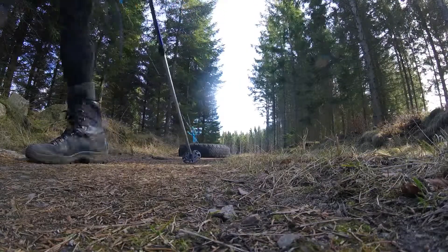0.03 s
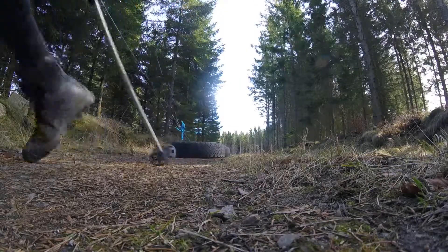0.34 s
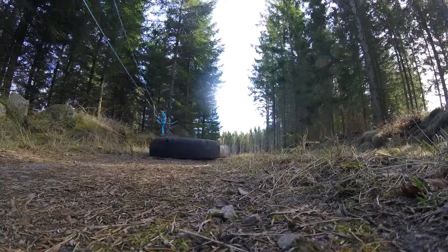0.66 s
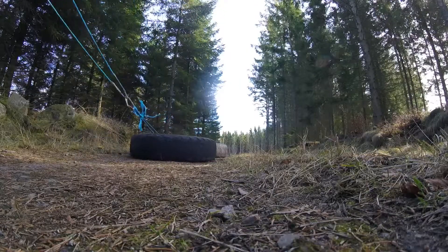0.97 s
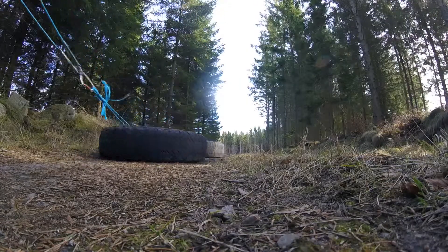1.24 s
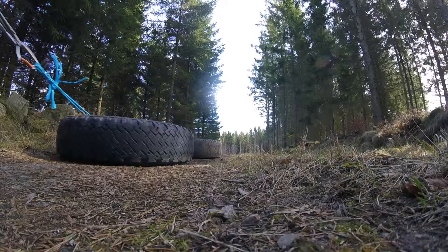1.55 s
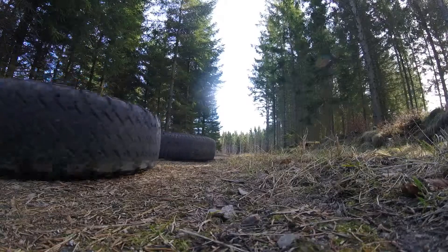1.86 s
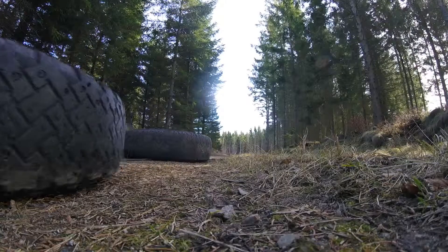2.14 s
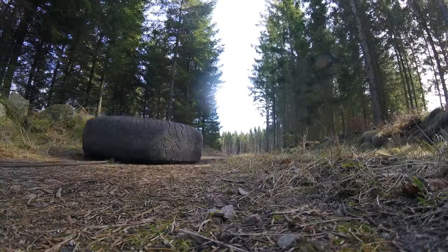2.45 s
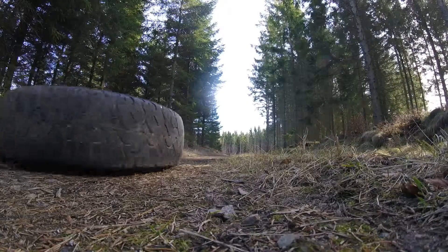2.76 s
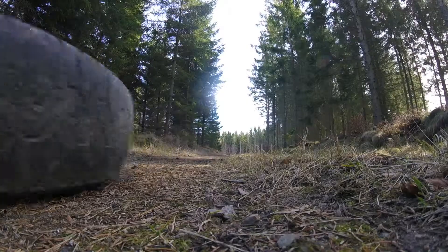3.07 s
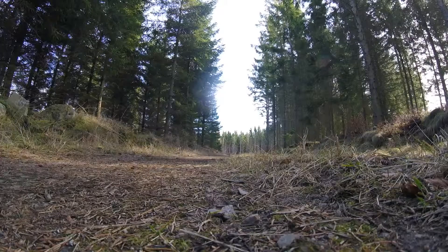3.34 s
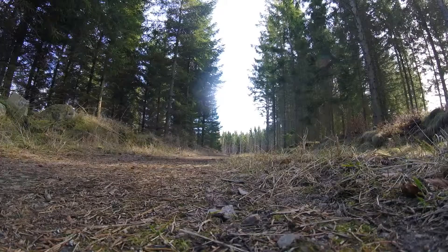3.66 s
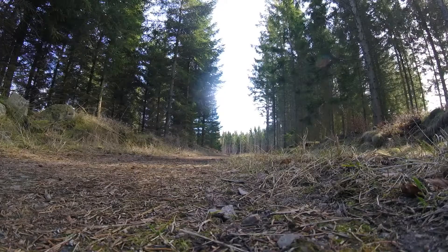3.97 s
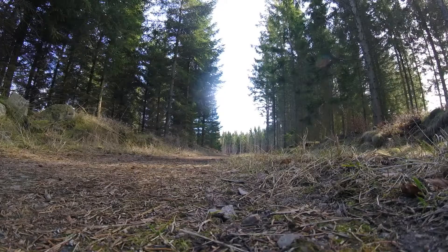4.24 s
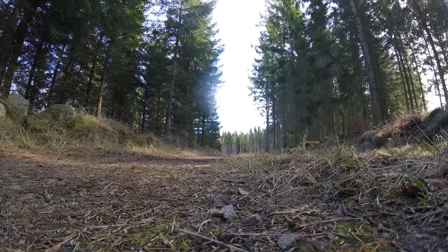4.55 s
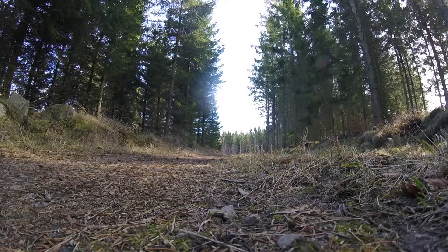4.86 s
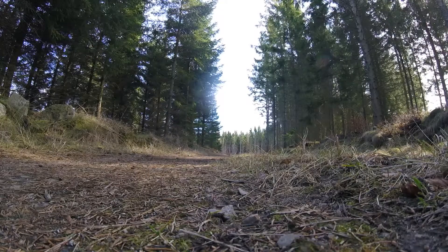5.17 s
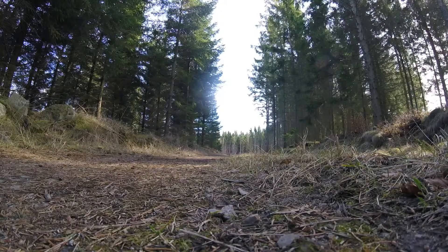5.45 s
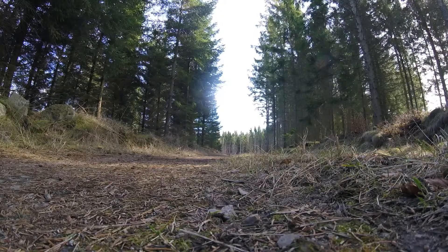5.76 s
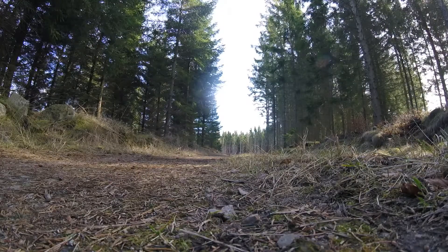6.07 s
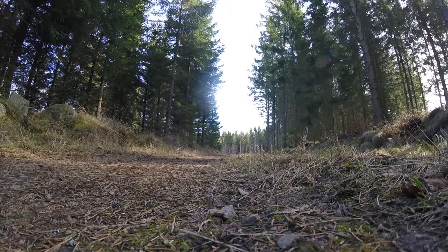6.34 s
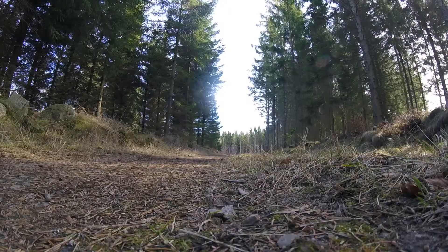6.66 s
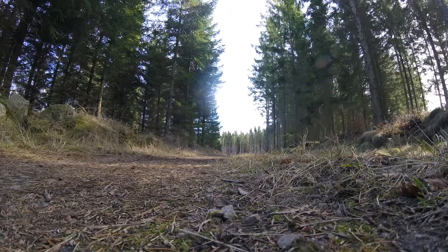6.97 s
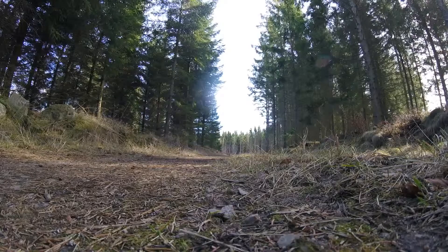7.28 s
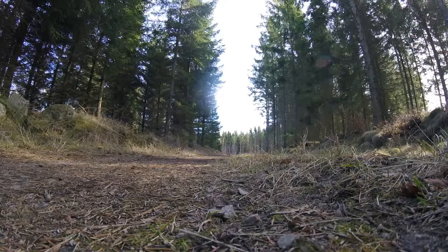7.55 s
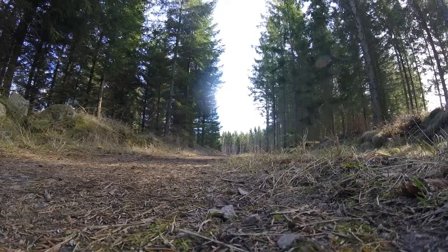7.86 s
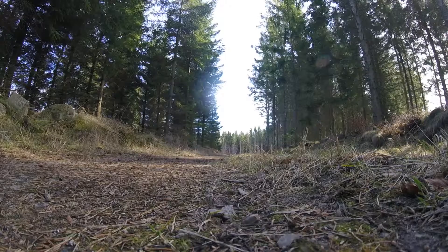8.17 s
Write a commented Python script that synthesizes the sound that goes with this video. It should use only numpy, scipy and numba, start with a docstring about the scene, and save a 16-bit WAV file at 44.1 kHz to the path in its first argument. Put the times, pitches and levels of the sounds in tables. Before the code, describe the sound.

Rough, crunching scraping approaches as two tyres are dragged over gravel, with a couple of sharp clicks from a trekking pole early on. The tyres pass one after the other close to a low microphone, with clacking stones, twig snaps, hollow rubber booms and ground rumble. The dragging moves away and comes to rest, and only a soft forest hush with a low hum remains.

```python
"""Two car tyres are hauled on a rope, stride by stride, along a forest gravel path, past a listener
at ground level, and come to rest. Stones knock against the rubber, grit crunches and twigs snap
under it, and the air inside the tyres booms. A trekking pole clicks on a stone.
A faint steady hiss and a low hum remain when the dragging stops."""
import sys
import numpy as np
from scipy import signal
from scipy.fft import rfft, irfft
from scipy.io import wavfile
from scipy.ndimage import uniform_filter1d
from numba import njit

SR = 44100
rng = np.random.default_rng(int(sys.argv[2]) if len(sys.argv) > 2 else 0)


def int16_out(signal):
    """Quantize to a 16-bit WAV file."""
    q = np.round(np.clip(np.atleast_2d(signal).T, -1, 1) * 32767)
    wavfile.write(sys.argv[1], SR, q.astype(np.int16))


N = 362061

# The tone of crunching grit and of hissing sand. Each row: frequency in Hz, relative level in dB.
GRIT_SPECTRUM = [(200, -1.5), (650, -1.5), (1300, 2), (2000, 4), (2900, 2.5), (3500, -2), (4200, -6),
                 (5600, -2), (7000, -14.5), (10000, -27), (14000, -98)]
SAND_SPECTRUM = [(2000, -28), (3900, -7), (4900, 3), (5900, 3.5), (6500, -1), (7000, -8), (8000, -11.5),
                 (9500, -20.5), (11000, -31.5), (14000, -58.5)]


def dragging():
    """The tread catches and slips over stones, grit and sand; all of them flutter with its grip."""
    pull_db, extra_grit_db = hauling()
    near_db = nearness()  # each layer follows its own share of this rise and fall
    ground_db = pull_db + drift(6.1)
    grit_db = ground_db + extra_grit_db
    boom_jolt, ground_jolt = jolts()
    grip = drift(24.6)
    coarse = grains(650, spread_db=3.0) * from_db(2.0 * grip)
    fine = grains(4000, spread_db=2.5) * from_db(3.7 * grip)
    dust = grains(9000, spread_db=4.0) * from_db(2.0 * grip)
    contacts = rms_one(fine) + 0.92 * rms_one(coarse)
    rolling = from_db(-35 + ground_db + 0.26 * near_db) * rolling_stones(coarse, fine)
    # Small chips ring as they are ground together.
    ticks = pings(rms_one(coarse) + 0.5 * rms_one(fine), low_hz=1680, high_hz=7400, cycles=20.0)
    grit = from_db(-39 + grit_db + 0.33 * near_db) * grinding_grit(contacts, ticks)
    sand = from_db(-39.5 + grit_db + 0.49 * near_db + sand_shade()) * hissing_sand(dust, ticks)
    boom_gain = from_db(-35 + 0.96 * pull_db + 0.037 * near_db + drift(6.5))
    boom = np.hypot(boom_gain, boom_jolt) * flexing(air_boom(contacts), bend=0.018, rate=7.97)
    boom = resonate(boom, hz=255, width=244)  # the hollow tyre rounds off each jolt
    walls = from_db(-46.5 + grit_db + 0.27 * near_db) * rubber_walls(coarse)
    rumble_gain = from_db(-40.5 + ground_db + 0.72 * near_db)
    rumble = np.hypot(rumble_gain, ground_jolt) * ground_rumble(fine)
    return rolling + grit + sand + boom + walls + rumble


def hauling():
    """Each stride tightens the rope. Gives the level of the drag and of its extra grit, in dB."""
    # Each row: time of full pull in seconds, length in seconds, boost in dB, extra grit in dB.
    pulls = [(0.167, 0.27, 2, 0), (1.056, 0.3, 2.5, 2.5), (1.735, 0.44, 3.5, 1.5), (2.267, 0.48, 5, -2),
             (3.031, 0.54, 6, -1.5), (3.69, 0.36, 4, 0), (4.29, 0.25, 3, 1.5), (4.714, 0.1, 2, -1.5),
             (5.244, 0.25, 1, 2.5), (5.673, 0.024, 10, 9.5)]
    # The tyres hang back for a moment. Each row: start in seconds, length in seconds, dip in dB.
    lulls = [(0.553, 0.028, -4.5), (0.676, 0.024, -5.5), (0.778, 0.013, -7), (1.99, 0.075, -3.5),
             (2.122, .01, -3.5), (2.169, 0.037, -3.5), (2.301, 0.01, -7.5), (2.389, 0.019, -5),
             (3.519, 0.017, -5), (4.095, 0.055, -3), (5.145, 0.03, -1.5)]
    # The walker tires and stops. Each row: time in seconds, change of level in dB.
    slowing = [(4.5, 2.5), (5.49, -4.5), (5.6, -17.5), (5.7, -25.5), (5.88, -50)]
    surges = np.array([swell(s, length, rise_s=0.067, fall_s=0.062) for s, length, *_ in pulls])
    dips_db = sum(db * swell(s, length, rise_s=0.014, fall_s=0.014) for s, length, db in lulls)
    _, _, pull_db, grit_db = np.transpose(pulls)
    return pull_db @ surges + dips_db + in_time(slowing), grit_db @ surges


def nearness():
    """Level in dB of the two tyres going by: power falls with the square of the distance."""
    # Each row: time when a tyre is closest in seconds, seconds it takes to travel that distance.
    passes = [(1.98, 0.2), (3.2, 0.14)]
    t = np.arange(N) / SR
    return 10 * np.log10(sum(1 / (1 + ((t - s) / passing_s) ** 2) for s, passing_s in passes))


def jolts():
    """Brief swells of boom and ground rumble as the tyres drop over bumps and a boot lands nearby."""
    # Each row: time in seconds, hollow boom in dB, ground thud in dB.
    bumps = [(0.034, -29, -39), (.1, -28, -47), (.255, -32, -50), (0.31, -21.5, -48), (.35, -26, -48.5),
             (.395, -23.5, -46), (0.441, -24.5, -44), (.475, -30, -48), (0.749, -26.5, -62),
             (0.941, -26, -39), (1.06, -18, -40), (1.16, -19.5, -46), (1.23, -24, -48), (1.315, -24.5, -52),
             (1.715, -23, -55), (1.771, -19, -45), (1.92, -23.5, -27.5), (1.961, -21.5, -36),
             (2.11, -20.5, -33), (2.253, -21, -42), (2.285, -31, -25.5), (2.445, -28.5, -32),
             (2.491, -21.5, -42), (2.57, -20, -31), (2.62, -25, -36), (2.68, -21, -44), (2.745, -22, -50),
             (2.785, -28, -49), (2.912, -21.5, -40), (2.985, -19.5, -45), (3.03, -24.5, -45),
             (3.12, -16, -46), (3.19, -17, -30), (3.26, -16, -54), (3.33, -23, -29), (3.415, -20, -49),
             (3.46, -20, -56), (3.6, -21, -34), (3.775, -26, -39), (3.84, -19.5, -50), (3.879, -17.5, -48),
             (3.975, -24.5, -50), (4.03, -27, -47), (4.47, -24, -48), (4.53, -22, -53), (4.638, -28, -58),
             (5.02, -35, -59), (5.289, -30.5, -57)]
    shapes = np.array([swell(s, hold_s=0, rise_s=0.031, fall_s=0.027) for s, *_ in bumps])
    _, boom_db, thud_db = np.transpose(bumps)
    boot = from_db(-29) * swell(0.17, hold_s=0, rise_s=0.031, fall_s=0.08)
    return from_db(boom_db) @ shapes, from_db(thud_db) @ shapes + boot


def air_boom(push):
    """The air in the tyres booms under the shaking tread; the rear one takes over from the front."""
    # Front tyre, then rear. Each row: pitch in Hz, width of the resonance in Hz, relative level in dB.
    cavities = [(264.3, 70, 0), (257.8, 88.6, 0)]
    rear_share = in_time([(2.1, 0), (2.6, 1)])
    boom = np.zeros(N)
    for (hz, width, db), share in zip(cavities, (1 - rear_share, rear_share)):
        air = resonate(resonate(push, hz, width), hz, width)
        boom += from_db(db) * np.sqrt(share) * even(air, span_s=0.036)
    return boom


def flexing(boom, bend, rate):
    """The tyre deforms as it slides, so the pitch of its boom wanders by the small share `bend`."""
    n = np.arange(N)
    return np.interp(n + np.cumsum(bend * drift(rate)), n, boom)


def rubber_walls(push):
    """Stones set the rubber walls ringing faintly in broken snatches."""
    # Each row: pitch in Hz, width of the resonance in Hz, relative level in dB.
    tones = [(473.4, 130, -7), (591.6, 58, 1.5)]
    rings = sum(from_db(db) * resonate(resonate(push, hz, width), hz, width) for hz, width, db in tones)
    return rms_one(rings)


def stones(contacts, cycles):
    """Stones clack against the rubber, each at its own pitch."""
    # The mix of stone sizes. Each row: pitch in Hz, relative level in dB.
    sizes = [(450, 13), (700, -29.5), (900, -1.5), (1200, 2.5), (1500, -3), (2000, -15), (2600, -16.5)]
    # Stones ring higher as the tyres approach than after. Each row: time in seconds, pitch factor.
    pitch = [(2.2, 1.041), (3.1, 0.956)]
    return pings(contacts, low_hz=508.5, high_hz=2537.0, cycles=cycles, sizes=sizes, pitch=in_time(pitch))


def rolling_stones(coarse, fine):
    """Stones clatter along under the tread, and small ones flip over at random."""
    clatter = stones(rms_one(coarse) + 0.98 * rms_one(fine), cycles=26.5)
    flips = muffle(stones(grains(44, spread_db=8.0), cycles=6.1), hz=3200)
    return even(clatter, span_s=0.094) + from_db(-7.5) * flips


def knocks(cycles, rise_s, crack_hz, crack_cycles, spray_s, spray_db, sand_db):
    """A big stone flips under the tread: one sharp crack, a brief spray of grit and a damped knock."""
    # Each row: start in seconds, knock level in dB, pitch in Hz, crack level in dB.
    big_stones = [(0.2032, -10.5, 1180, -23), (0.5021, -11.5, 1000, -47), (0.5145, -16, 1200, -42),
                  (0.5644, -22, 1050, -48), (0.5935, -18.5, 1120, -45.5), (0.8997, -17, 1120, -45),
                  (1.0042, -9, 1510, -15.5), (1.0157, -17, 1500, -14.5), (1.0505, -10.5, 1780, -22),
                  (1.1894, -9.5, 1050, -42), (1.2413, -8.5, 1070, -17), (1.3077, -34, 1700, -13),
                  (1.377, -15, 1250, -22.5), (1.6944, -24, 1610, -16.5), (1.709, -9, 1280, -14.5),
                  (1.7427, -14, 1800, -15.5), (1.8512, -7.5, 1070, -26), (1.8881, -9.5, 1130, -13.5),
                  (1.982, -13, 1700, -14.5), (1.9872, -11, 1500, -22), (2.0333, -5, 1260, -14.5),
                  (2.0442, -7, 1400, -20), (2.0785, -10.5, 1450, -25), (2.0992, -13, 1450, -17),
                  (2.1072, -9, 1100, -19), (2.1257, -8, 1130, -20), (2.1367, -6.5, 1170, -13.5),
                  (2.1418, -5, 1160, -28), (2.2008, -9.5, 1290, -25), (2.2738, -7, 1220, -25),
                  (2.3433, -4, 1200, -35), (2.3478, -7.5, 1300, -21), (2.379, -7, 1340, -42),
                  (2.4255, -9, 1370, -33), (2.4344, -5, 1080, -27), (2.4835, -13, 1440, -19),
                  (2.4864, -5.5, 1400, -21), (2.662, -6, 1160, -40.5), (2.708, -3.5, 1770, -16),
                  (2.8419, -11, 1460, -30), (2.981, -15, 1400, -21.5), (3.0818, -7, 960, -18),
                  (3.1728, -8, 1070, -20), (3.1946, -16, 1170, -13.5), (3.2018, -11, 1060, -18),
                  (3.2126, -5, 980, -41), (3.3352, -12, 1060, -25), (3.3519, -16, 1000, -19),
                  (3.496, -7, 1110, -24), (3.6433, -7.5, 1070, -35.5), (3.6474, -9.5, 1260, -22),
                  (4.255, -19, 1050, -19.5), (4.345, -10.5, 980, -40), (4.4199, -16.5, 990, -18.5),
                  (4.535, -21, 1600, -22), (4.556, -7.5, 980, -25), (4.6415, -15, 1280, -50),
                  (4.7963, -13.5, 920, -37), (4.8773, -21, 1060, -32), (4.9125, -29, 1700, -25.5),
                  (4.9265, -21, 1190, -33), (5.217, -32, 1700, -31), (5.3835, -25, 1150, -39),
                  (5.4575, -23, 1300, -43), (5.5209, -22.5, 1290, -52), (5.5674, -29.5, 1310, -60)]
    bodies, spray = np.zeros(N), np.zeros(N)
    t = np.arange(SR // 20) / SR
    for s, db, hz, crack_db in big_stones:
        span = slice(int(s * SR), int(s * SR) + len(t))
        envelope = (1 - np.exp(-t / rise_s)) * np.exp(-np.log(1000) * t * hz / cycles)
        bodies[span] += from_db(db) * envelope / envelope.max() * np.sin(2 * np.pi * hz * t)
        spray[span] += from_db(crack_db + spray_db) * rng.choice([-1, 1], len(t)) * np.exp(-t / spray_s)
    times, _, _, cracks_db = np.transpose(big_stones)
    cracks = ring(strikes(times, cracks_db), crack_hz, crack_cycles / crack_hz)
    sand = from_db(sand_db + sand_shade()) * colour(spray, SAND_SPECTRUM)
    gritty = colour(spray, GRIT_SPECTRUM) + sand
    # The rubber dulls what happens beneath it.
    return muffle(bodies, hz=3200) + muffle(gritty - 2 * cracks, hz=6100)


def scuffs(per_s, width_share, release_s, depth_db, top_hz):
    """The tread shoves a heap of stones: a dull grinding builds up, then lets go."""
    # Each row: time of the peak in seconds, level in dB, build-up in seconds, pitch in Hz.
    heaps = [(.617, -25, 0.0096, 1180), (.748, -33, 0.028, 1180), (.815, -31, 0.022, 1190),
             (0.972, -23.5, 0.014, 1050), (1.049, -24, 0.018, 1740), (1.195, -22, 0.0056, 1090),
             (2.145, -13.5, 0.0062, 1120), (2.25, -22, 0.02, 1220), (2.35, -17, 0.024, 1270),
             (2.436, -15, 0.023, 1160), (2.59, -27, 0.086, 1400), (2.636, -25, 0.04, 1290),
             (3.094, -17.5, 0.012, 980), (3.126, -16.5, 0.013, 990), (3.205, -17, 0.028, 940),
             (3.25, -20.5, 0.017, 1360), (3.352, -15, 0.016, 1050), (3.751, -21, 0.013, 1070),
             (3.786, -22.5, 0.022, 990), (4.021, -18.5, 0.02, 930), (4.049, -22.5, 0.0091, 870),
             (4.552, -29, 0.13, 920), (5.31, -32, 0.027, 1180), (5.455, -37.5, 0.094, 1270)]
    out = np.zeros(N)
    t = np.arange(SR // 4) / SR - 1 / 8  # seconds from the peak
    contacts = grains(per_s, spread_db=0.5)
    for s, db, build_s, hz in heaps:
        start = int((s + t[0]) * SR)
        span = slice(start, start + len(t))
        grinding = muffle(resonate(contacts[span], hz, width_share * hz), hz=top_hz)
        level_db = db - depth_db * np.maximum(-t / build_s, t / release_s)
        out[span] += from_db(level_db) * even(grinding, span_s=0.008)
    return out


def crunches(per_s, sand_db, stones_db):
    """Packed gravel breaks loose in a short volley of contacts."""
    # Each row: start in seconds, level in dB, rough length in seconds.
    patches = [(0.182, -28, 0.05), (0.259, -24, 0.013), (0.303, -28.5, 0.016), (0.417, -31, 0.073),
               (0.913, -31.5, 0.084), (1.005, -26.5, 0.11), (1.087, -24.5, 0.0096), (1.135, -27, 0.013),
               (1.308, -24, 0.02), (1.569, -26.5, 0.011), (1.701, -17.5, 0.027), (1.759, -20, 0.051),
               (1.802, -24, 0.052), (1.899, -14.5, 0.0023), (1.974, -17.5, 0.01), (2.065, -16, 0.011),
               (2.143, -21.5, 0.013), (2.336, -28, 0.054), (2.43, -29.5, 0.011), (2.53, -27, 0.061),
               (2.977, -20, 0.014), (3.073, -28, 0.03), (3.171, -17, 0.0088), (3.186, -25.5, 0.029),
               (3.337, -25, 0.023), (3.492, -18, 0.015), (3.55, -31, 0.0193), (3.764, -26, 0.03),
               (3.867, -23.5, 0.014), (4.344, -23.5, 0.015), (4.734, -28, 0.0077), (4.795, -30, 0.02),
               (5.03, -31, 0.04)]
    envelope = np.zeros(N)
    for s, db, length in patches:
        hold_end, fade_end = s + 0.0016 + 0.34 * length, s + 0.0014 + 1.03 * length
        envelope += from_db(db) * in_time([(s - 0.001, 0), (s + 0.00022, 1), (hold_end, 1), (fade_end, 0)])
    contacts = grains(per_s, spread_db=4.0)
    grit = rms_one(colour(contacts, GRIT_SPECTRUM))
    sand = from_db(sand_db + sand_shade()) * rms_one(colour(contacts, SAND_SPECTRUM))
    clatter = from_db(stones_db) * stones(contacts, cycles=35.0)
    return envelope * even(grit + sand + clatter, span_s=0.045)


def grinding_grit(contacts, ticks):
    """Grit crackles under the tread, and single sharp chips spit out."""
    chips = pings(grains(85, spread_db=1.3), low_hz=1500, high_hz=3300, cycles=3.6)
    crackle = colour(ticks + 2.5 * rms_one(contacts), GRIT_SPECTRUM)
    return even(crackle, span_s=0.094) + from_db(-3.5) * muffle(chips, hz=4500)


def hissing_sand(dust, ticks):
    """Thousands of tiny contacts a second blur into a hiss."""
    return even(colour(ticks + 2.9 * rms_one(dust), SAND_SPECTRUM), span_s=0.22)


def sand_shade():
    """The drop in the sand's hiss, in dB, once the tyres are behind the listener."""
    return in_time([(3.12, 0), (4.22, -13.5)])


def ground_rumble(contacts):
    """The dragging tread makes the ground rumble."""
    # Each row: frequency in Hz, relative level in dB.
    spectrum = [(15, -27.5), (40, -15.5), (65, 12), (85, 20.5), (103, 22), (130, 16), (180, 13.5),
                (300, -43.5)]
    return even(colour(contacts, spectrum), span_s=0.023)


def twig_snaps(ring_s, splinter_db, splinter_s):
    """Dry twigs break under the tread with a short bright ring and a spray of splinters."""
    # Each row: start in seconds, level in dB, pitch in Hz.
    twigs = [(1.3203, -12, 5300), (2.0335, -13, 3100), (2.7085, -7.5, 3250), (2.9817, -26, 3770),
             (2.9843, -5.5, 5500)]
    t = np.arange(N) / SR
    rings = sum(ring(strikes([s], db), hz, ring_s) for s, db, hz in twigs)
    envelope = sum(from_db(db) * (t >= s) * np.exp(-np.abs(t - s) / splinter_s) for s, db, _ in twigs)
    splinters = resonate(envelope * rng.choice([-1, 1], N), hz=5200, width=2200)
    return muffle(rings, hz=6000) + from_db(splinter_db) * muffle(splinters, hz=8500)


def trekking_pole(scratch_db, scratch_s):
    """The hard tip of the pole scratches and chatters on a stone, and the metal shaft rings."""
    # The tip is planted, then later strikes and bounces. Each row: time in seconds, level in dB.
    taps = [(0.2612, -27), (0.266, -20.5), (0.5514, -18.5), (0.5529, -20), (0.5585, -32), (0.5592, -17),
            (0.5586, -25)]
    # The shaft's tones. Each row: pitch in Hz, relative level in dB, seconds to fade by 60 dB.
    tones = [(1720, -13, 0.014), (2450, -2, 0.02), (3580, -6, 0.015), (4650, -10, 0.0075),
             (5660, 2.5, 0.0097), (5770, -1, 0.011), (6450, -18, 0.013), (8500, -22, 0.014),
             (10200, -29, 0.012)]
    clicks = strikes(*np.transpose(taps))
    rings = sum(from_db(db) * ring(clicks, hz, ring_s) for hz, db, ring_s in tones)
    envelope = signal.lfilter([1], [1, -np.exp(-1 / (scratch_s * SR))], clicks + 1e-18)
    scratch = resonate(envelope * rng.standard_normal(N), hz=4570, width=1500)
    return muffle(rings + from_db(scratch_db) * scratch, hz=8350)


def forest_hush(hush_db, hum_hz, waver_hz, hum_db):
    """Soft forest hush with a thin hiss and a low wavering hum."""
    # Each row: frequency in Hz, relative level in dB.
    spectrum = [(15, -13), (38, -3.5), (53, -2), (70, -7.5), (110, -11), (250, -16), (700, -16.5),
                (1500, -27), (3000, -34.5), (4300, -42.5), (6000, -37), (6500, -23.5), (7000, -29),
                (10500, -40), (14000, -46.5)]
    phase = 2 * np.pi * np.cumsum(hum_hz + waver_hz * drift(6.6)) / SR
    hum = np.sin(phase) * from_db(hum_db + drift(4.3))
    return from_db(hush_db) * rms_one(colour(rng.standard_normal(N), spectrum)) + hum


def grains(per_s, spread_db):
    """Random contacts, about `per_s` each second: many small, a few large."""
    sizes = from_db(spread_db * np.minimum(rng.exponential(1, N), 4.5)) * rng.choice([-1, 1], N)
    return sizes * (rng.random(N) < per_s / SR)


def strikes(times, levels_db):
    """One click at each time."""
    clicks = np.zeros(N)
    clicks[(np.asarray(times) * SR).astype(int)] = from_db(levels_db)
    return clicks


def pings(contacts, low_hz, high_hz, cycles, sizes=((100, 0), (20000, 0)), pitch=1):
    """Each contact rings one grain at a random pitch, fading by 60 dB over `cycles` vibrations."""
    at = np.flatnonzero(contacts)
    hz = (low_hz * (high_hz / low_hz) ** rng.random(N))[at]
    turns = np.exp((2j * np.pi - np.log(1000) / cycles) * hz * np.broadcast_to(pitch, N)[at] / SR)
    heights = contacts[at] * from_db(at_hz(sizes, hz)) * np.sqrt(hz)
    rings = dying_sines(at, heights, turns, size=int(cycles * SR / low_hz))
    return rms_one(np.pad(rings, (0, N))[:N])


@njit
def dying_sines(at, heights, turns, size):
    """Add up fading tones: each starts at its own sample, then shrinks and turns by a constant step."""
    out = np.zeros(at[-1] + size)
    for k in range(len(at)):
        z = heights[k] + 0j
        for n in range(size):
            out[at[k] + n] += z.imag
            z *= turns[k]
    return out


def ring(clicks, hz, ring_s):
    """Each click starts a tone of the same height that fades by 60 dB in `ring_s` seconds."""
    r, w = np.exp(-np.log(1000) / (ring_s * SR)), 2 * np.pi * hz / SR
    return signal.lfilter([0, np.sin(w)], [1, -2 * r * np.cos(w), r * r], clicks + 1e-18)


def resonate(x, hz, width):
    """Let through a band `width` Hz wide, with a gain of 1 at its peak."""
    r = np.exp(-np.pi * width / SR)
    feedback = [1, -2 * r * np.cos(2 * np.pi * hz / SR), r * r]
    return signal.lfilter(np.array([1, 0, -1]) * (1 - r * r) / 2, feedback, x + 1e-18)


def muffle(x, hz):
    """Soften the treble above `hz`."""
    return signal.sosfilt(signal.butter(2, min(hz, 0.45 * SR), fs=SR, output="sos"), x + 1e-18)


def colour(x, spectrum, size=8192):
    """Shape the tone to a spectrum with a minimum-phase filter, so clicks keep their sharp front."""
    gains = from_db(at_hz(spectrum, np.fft.rfftfreq(size, 1 / SR)))
    cepstrum = irfft(np.log(gains))
    cepstrum[1:size // 2] *= 2
    cepstrum[size // 2 + 1:] = 0  # nothing sounds ahead of a click
    response = irfft(np.exp(rfft(cepstrum)))
    return signal.oaconvolve(x, response / np.abs(response).max())[:N]


def drift(rate):
    """A smooth random wander of typical size 1; a higher `rate` (Hz) wanders faster."""
    step = 40  # samples between points
    r = np.exp(-2 * np.pi * rate * step / SR)
    slow = signal.lfilter([1], [1, -2 * r, r * r], rng.standard_normal(N // step + 2002))[2000:]
    return np.interp(np.arange(N) / step, np.arange(len(slow)), rms_one(slow))


def swell(s, hold_s, rise_s, fall_s):
    """Rise to 1 at `s` seconds, hold, then fall."""
    return np.interp(np.arange(N) / SR, np.cumsum([s - rise_s, rise_s, hold_s, fall_s]), [0, 1, 1, 0])


def even(x, span_s):
    """Hold the average level (rms) at 1 over short spans, keeping the grain within them."""
    size = max(int(span_s * SR), 2)
    power = uniform_filter1d(uniform_filter1d(x * x, size), size)
    return x / np.sqrt(np.abs(power) + 1e-12)


def in_time(points):
    """Join (seconds, value) points with straight lines, giving a value for every sample."""
    return np.interp(np.arange(N) / SR, *np.transpose(points))


def at_hz(spectrum, hz):
    """Read a spectrum's level in dB between its points, on a log-frequency axis."""
    points_hz, points_db = np.transpose(spectrum)
    return np.interp(np.log(hz + 1e-9), np.log(points_hz), points_db)


def from_db(db):
    """Turn decibels into a gain."""
    return 10 ** (np.asarray(db) / 20)


def rms_one(x):
    """Scale to an average level (rms) of 1."""
    return x / np.sqrt(np.mean(x ** 2) + 1e-20)


def scene():
    """Everything as heard from the edge of the path, in one channel."""
    tyres = dragging() + crunches(per_s=2700, sand_db=-0.5, stones_db=-0.5)
    tyres += twig_snaps(ring_s=0.0033, splinter_db=-11, splinter_s=0.0029)
    tyres += knocks(cycles=6.4, rise_s=0.0003, crack_hz=2520, crack_cycles=2.4,
                    spray_s=0.0028, spray_db=-6.5, sand_db=-3.0)
    tyres += scuffs(per_s=5000, width_share=0.35, release_s=0.01, depth_db=14, top_hz=2610)
    pole = trekking_pole(scratch_db=2.0, scratch_s=0.0029)
    forest = forest_hush(hush_db=-53, hum_hz=53.0, waver_hz=1.5, hum_db=-50.5)
    return (tyres + pole + forest)[None, :]


def record(dry):
    """Cut the bass below 28 Hz and the treble above 14000 Hz."""
    thinned = signal.sosfilt(signal.butter(2, 28, "high", fs=SR, output="sos"), dry)
    return signal.sosfilt(signal.ellip(10, 0.1, 80, 14000, fs=SR, output="sos"), thinned)


dry = scene()
out = record(dry)
int16_out(out)
```